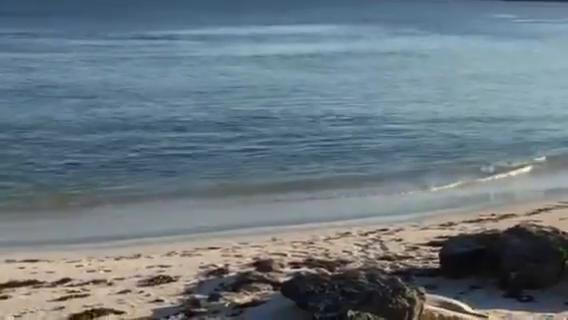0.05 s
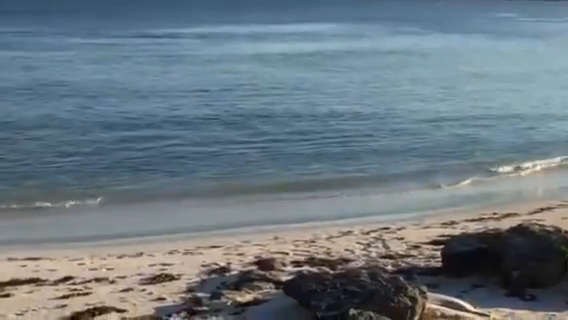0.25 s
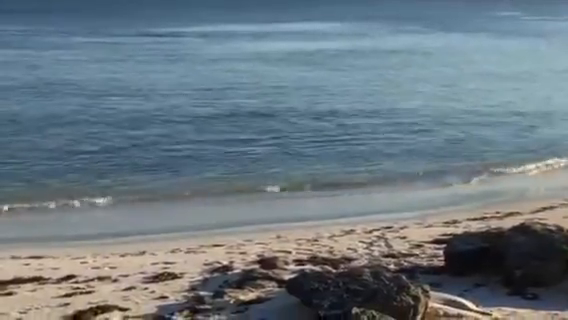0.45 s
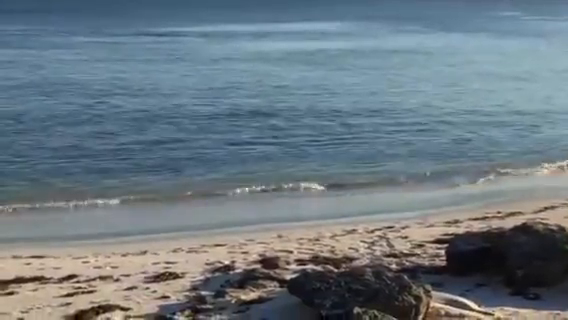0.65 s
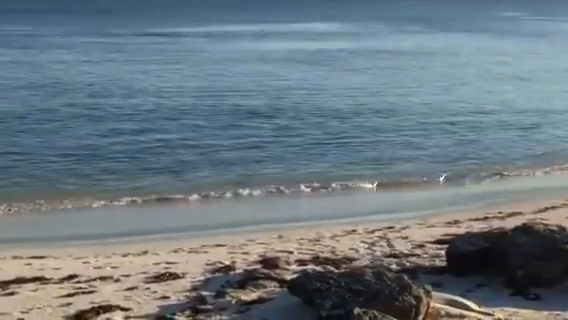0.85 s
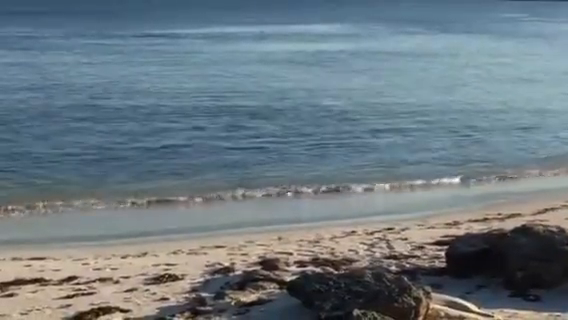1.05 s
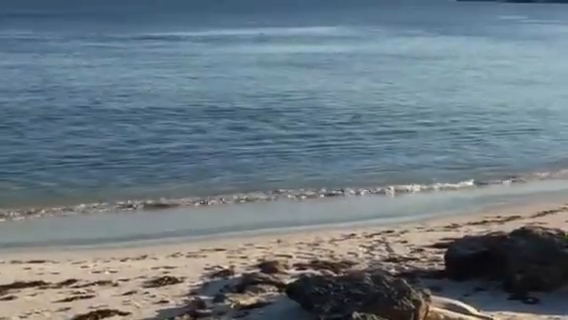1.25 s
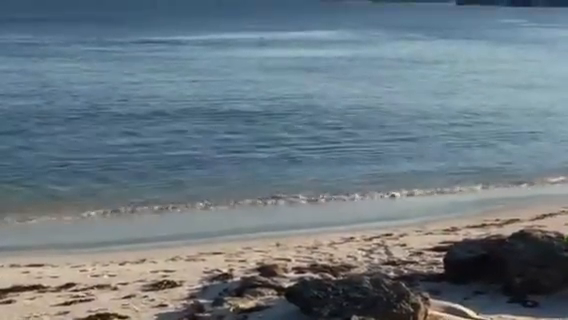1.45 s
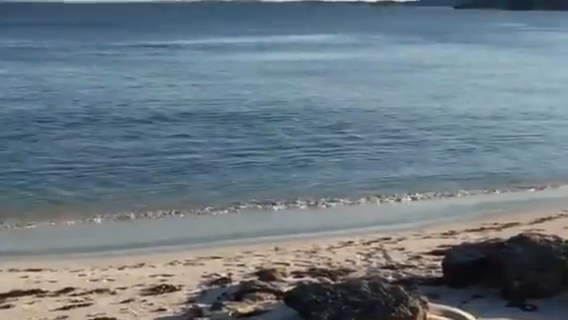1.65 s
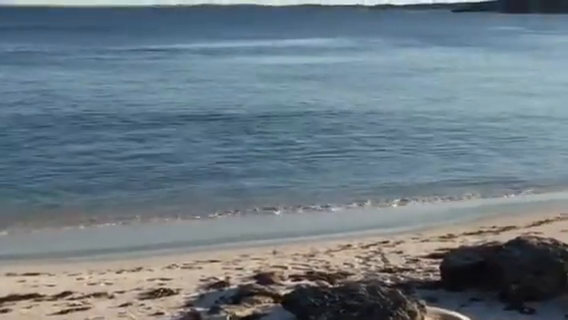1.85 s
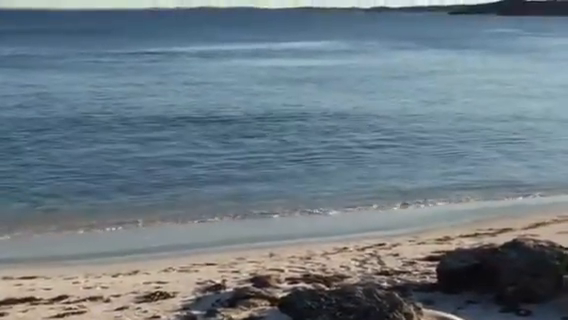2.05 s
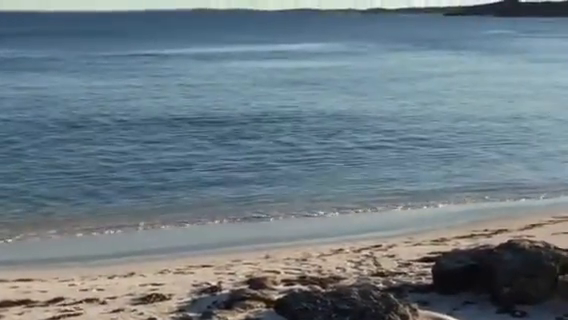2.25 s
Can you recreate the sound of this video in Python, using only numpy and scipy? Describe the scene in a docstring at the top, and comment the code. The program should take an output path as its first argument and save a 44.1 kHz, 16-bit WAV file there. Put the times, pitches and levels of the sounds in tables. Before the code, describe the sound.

A small wave breaks on a sandy beach a few metres away. Quiet lapping swells into churning bubbles, fizzing foam, plops and soft slaps, then the wash dies away in the open air.

```python
"""A calm sea laps over a faint rumble, and single bubbles begin to plop. Then a small wave breaks
along a sandy beach a few metres away: foam fizzes, a cloud of bubbles churns, big air pockets gulp
under the folding crest, and water slaps and thuds softly before the wash dies out on the sand.
Each bubble is a damped resonator, with the trapped air as its spring and the water around it as its
mass: the larger the bubble, the lower it rings."""
import sys
import numpy as np
from scipy.fft import rfft, irfft, next_fast_len
from scipy.io import wavfile
from scipy.ndimage import map_coordinates

SR = 44100
rng = np.random.default_rng(int(sys.argv[2]) if len(sys.argv) > 2 else 0)


def master_out(mix):
    """Clip the mix to full scale and print it as 16-bit PCM to the path in sys.argv[1]."""
    frames = np.transpose(np.atleast_2d(mix))
    ceiling = np.clip(frames, -1, 1)
    pcm = np.round(ceiling * 32767).astype(np.int16)
    wavfile.write(sys.argv[1], SR, pcm)


N = 101429
FADE_DB_PER_S = 66


def amp(db):
    """Decibels to amplitude ratio."""
    return 10 ** (np.asarray(db) / 20)


def unit(x):
    """Normalisation to rms 1."""
    return x / np.sqrt(np.mean(x ** 2) + 1e-20)


def level(rows):
    """Amplitude envelope through (s, dB) points, with exponential decay beyond both ends."""
    s, db = np.transpose(rows)
    t = np.arange(N) / SR
    outside_s = np.abs(t - np.clip(t, s[0], s[-1]))
    return amp(np.interp(t, s, db) - FADE_DB_PER_S * outside_s)


def wobble(rate):
    """Random modulation: a smooth curve with rate knots a second."""
    return map_coordinates(rng.standard_normal(400), [np.arange(N) * rate / SR], mode="wrap")


def filtered(x, response):
    """Linear filtering: the spectrum of x times a frequency response."""
    m = next_fast_len(len(x) + 8192)
    return irfft(rfft(x, m) * response(np.fft.rfftfreq(m, 1 / SR)), m)[:len(x)]


def coloured(x, points):
    """Spectral shaping of x through (Hz, dB) points, at rms 1."""
    f, db = np.transpose(points)
    return unit(filtered(x, lambda hz: amp(np.interp(np.log(hz + 1), np.log(f + 1), db))))


def add(track, s, sound):
    """Superposition of a sound on the track at s seconds."""
    part = track[max(round(s * SR), 0):][:len(sound)]
    part += sound[:len(part)]


def cloud(lo_hz, hi_hz, cycles, spread_db, rise, count):
    """Bubble resonance: many damped sines start at random times, each rising in pitch."""
    when, pitch, size, life = rng.random((count, 4)).T[:, :, None]
    hz = lo_hz * (hi_hz / lo_hz) ** pitch
    t60 = cycles * (.5 + life) / hz
    t = np.arange(int(min(cycles / lo_hz, .08) * SR)) / SR
    gain = amp(spread_db * np.minimum(-np.log(1 - size), np.pi)) * hz  # even power per Hz
    envelope = gain * amp(-60 * t / t60) * (1 - np.exp(-2 * hz * t))
    rings = envelope * np.sin(2 * np.pi * hz * t * (1 + rise * np.minimum(t / t60, 1) / 2))
    at = (when * N).astype(int) + np.arange(len(t))
    return unit(np.bincount(at.ravel(), rings.ravel())[:N])


def water(bubbles, spectrum, blur_db, surge_db, surge_rate):
    """Incoherent summation: countless small bubbles blur into noise under distinct ones; both surge."""
    blur = amp(blur_db) * coloured(rng.standard_normal(N), spectrum)
    mix = coloured(bubbles, spectrum) + blur
    return unit(mix * amp(surge_db * wobble(surge_rate)))


# Spectrum of the calm sea. Each row: frequency in Hz, relative level in dB.
SEA_SPECTRUM = [(60, -24), (110, -2), (200, -10), (300, -5.5), (470, -14.5), (660, -8), (850, -14),
                (1200, -8.5), (1450, -14.5), (1900, -11), (3000, -15.5), (5000, -22), (7500, -25.5),
                (10400, -27.5), (15000, -30.5)]
SEA_DB = -63

def sea():
    """Superposition: the brief bubble tones of ripples along the shore sum to a steady lapping."""
    ripples = cloud(409.5, 8170, cycles=16, spread_db=2, rise=0.075, count=2600)
    return amp(SEA_DB) * water(ripples, SEA_SPECTRUM, blur_db=4.5, surge_db=0.6, surge_rate=12)


# Envelope of the rumble. Each row: time in seconds, relative level in dB.
RUMBLE_ENVELOPE = [(0, -75), (.42, -72.5), (.60, -64), (.84, -67.5), (.95, -63), (1.35, -71.5),
                   (1.67, -63.5), (1.95, -72.5), (2.3, -78)]
# Its spectrum. Each row: frequency in Hz, relative level in dB.
RUMBLE_SPECTRUM = [(10, -60), (24, -26), (36, -17.5), (50, 3.5), (75, -1), (100, -5), (150, -8), (300, -31),
                   (900, -85)]

def rumble():
    """Amplitude-modulated noise: the moving water swells into soft, low thuds."""
    return amp(1.5) * level(RUMBLE_ENVELOPE) * coloured(rng.standard_normal(N), RUMBLE_SPECTRUM)


def spray(hz, octaves, size):
    """Band-limited noise: fine drops merge into a patter around one pitch, at rms 1."""
    noise = rng.standard_normal(size)
    return unit(filtered(noise, lambda f: np.exp(-.5 * (np.log2((f + 1) / hz) / octaves) ** 2)))


# Bubbles that stand out. Each row: start in seconds, pitch in Hz, level in dB,
# 60 dB decay time in seconds, gain of the splash relative to the ring.
SINGLE_BUBBLES = [(.223, 628, -51, 0.09, 0.11), (0.228, 1140, -47, 0.05, 0.54),
                  (0.321, 311, -54.5, 0.1, 0.26), (.352, 1196, -46, 0.054, 0.31),
                  (0.433, 155, -54.5, 0.13, 1), (.524, 710, -40, 0.035, 0.45), (.530, 1070, -48, .04, .5),
                  (0.607, 321, -48, 0.14, 0.63), (.636, 108.7, -45.5, 0.082, 0.45),
                  (0.659, 355, -45.5, 0.11, 0.96), (0.713, 1105, -40, 0.043, 0.65),
                  (0.757, 1164, -38, 0.06, 0.5), (0.796, 319, -51, 0.067, .5),
                  (.812, 55.3, -50, 0.24, 0.27), (.912, 737, -37.5, .06, 0.48),
                  (1.091, 710, -45.5, 0.067, 0.83), (1.171, 1180, -45, 0.083, 0.25),
                  (1.186, 302, -51, 0.29, 0.13), (1.224, 141, -56, 0.13, 0.72), (1.3, 1200, -40, 0.055, .6),
                  (1.313, 167, -49, 0.095, 0.53), (1.385, 321, -42.5, .07, 0.36),
                  (1.476, 306, -48.5, 0.11, 0.47), (1.479, 1176, -45, 0.078, .2),
                  (1.546, 685, -34.5, 0.028, 0.32), (1.553, 322, -48, .08, 0.73),
                  (1.571, 1360, -39.5, 0.04, 0.18), (1.692, 665, -50, 0.1, 0.18),
                  (2.010, 1024, -48, 0.054, 0.75), (2.019, 685, -61, 0.08, 1.0),
                  (2.111, 465, -53, 0.057, 0.57), (2.225, 128, -57.5, 0.1, 1),
                  (2.288, 653, -53, 0.11, 0.44)]
PLOP_ATTACK_S, PLOP_RISE_PER_S = 0.0024, 0.83

def plops():
    """Damped oscillation: each large bubble rings with a rising pitch inside its own little splash."""
    out, t = np.zeros(N), np.arange(SR // 5) / SR
    for start, hz, db, t60, splash in SINGLE_BUBBLES:
        ring = np.sin(2 * np.pi * hz * t * (1 + PLOP_RISE_PER_S * t / 2))
        envelope = amp(db - 60 * t / t60) * (1 - np.exp(-t / PLOP_ATTACK_S))
        add(out, start, envelope * (ring + splash * spray(hz, octaves=0.3, size=len(t))))
    return out


# Envelope of the foam. Each row: time in seconds, relative level in dB.
FOAM_ENVELOPE = [(.30, -77), (.365, -66.5), (.53, -69), (.69, -56.5), (.85, -54.5), (1.03, -56.5),
                 (1.27, -58), (1.39, -55), (1.59, -61), (1.72, -66.5), (1.92, -73.5), (2.15, -73)]
# Its spectrum. Each row: frequency in Hz, relative level in dB.
FOAM_SPECTRUM = [(600, -72), (2000, -20), (4000, -1), (6000, 1), (7500, -5.5), (9500, -7), (10400, -14.5),
                 (12000, -12), (15000, -20.5)]

def foam():
    """Resonant frequency varies inversely with radius, so tiny foam bubbles make a high fizz."""
    bubbles = cloud(3250, 15450, cycles=32, spread_db=3.5, rise=.04, count=7000)
    fizz = water(bubbles, FOAM_SPECTRUM, blur_db=1.0, surge_db=0.7, surge_rate=24.85)
    return amp(1.2) * level(FOAM_ENVELOPE) * fizz


# Envelope of the churning. Each row: time in seconds, relative level in dB.
CHURN_ENVELOPE = [(.305, -66.5), (.345, -57.5), (.42, -52.5), (.55, -53), (.58, -51), (.70, -47),
                  (.82, -48), (1.0, -46.5), (1.27, -48.5), (1.46, -46), (1.63, -51), (1.77, -54.5),
                  (1.87, -60.5), (1.93, -67), (2.06, -65.5)]
# Its spectrum. Each row: frequency in Hz, relative level in dB.
CHURN_SPECTRUM = [(100, -72), (250, -46), (550, -3.5), (800, -7.5), (1150, 0), (1600, -1.5), (2600, -2.5),
                  (4000, -6.5), (5500, -17.5), (8000, -28.5), (12000, -60)]

def churn():
    """Air entrainment: the spilling crest drags in thousands of ringing bubbles."""
    bubbles = cloud(544.6, 6316, cycles=73, spread_db=3.5, rise=0.038, count=4600)
    wash = water(bubbles, CHURN_SPECTRUM, blur_db=2, surge_db=.5, surge_rate=40)
    return amp(0.33) * level(CHURN_ENVELOPE) * wash


# Envelope of the air pockets. Each row: time in seconds, relative level in dB.
POCKET_ENVELOPE = [(.32, -85), (.49, -62.5), (.555, -63), (.576, -53), (.67, -50), (.73, -53), (1.0, -53),
                   (1.27, -58.5), (1.37, -51), (1.54, -58), (1.62, -60.5), (1.85, -70)]
# Their spectrum. Each row: frequency in Hz, relative level in dB.
POCKET_SPECTRUM = [(40, -54), (80, -11), (130, -10.5), (200, -6.5), (310, -1), (450, -3), (700, -0.5),
                   (950, 1.5), (1600, -15), (4000, -70)]

def air_pockets():
    """Mass-spring resonance: big pockets of air under the folding crest pulsate in low gulps."""
    pockets = cloud(112, 1067, cycles=22.5, spread_db=2.0, rise=0.063, count=800)
    gulps = water(pockets, POCKET_SPECTRUM, blur_db=0, surge_db=2.1, surge_rate=25)
    return level(POCKET_ENVELOPE) * gulps


# Slaps of water and drops. Each row: start in seconds, centre frequency in Hz, level in dB,
# 60 dB decay time in seconds.
WATER_IMPACTS = [(.329, 3170, -47.5, 0.062), (.410, 2270, -50, 0.14), (0.568, 2770, -51, 0.093),
                 (.566, 380, -49.5, 0.071), (.579, 14000, -53, .04), (0.675, 3440, -44, 0.064),
                 (0.757, 1700, -31, 0.018), (0.776, 8500, -50, .04), (2.010, 2260, -58, 0.11)]
SLAP_ATTACK_S, SLAP_OCTAVES = 0.003, 0.56

def slaps():
    """Impact noise: pieces of the crest hit the water and throw a short spray."""
    out, t = np.zeros(N), np.arange(SR // 5) / SR
    for start, hz, db, t60 in WATER_IMPACTS:
        envelope = amp(db - 60 * t / t60) * (1 - np.exp(-t / SLAP_ATTACK_S))
        add(out, start, envelope * spray(hz, SLAP_OCTAVES, size=len(t)))
    return out


def scene():
    """Free field: on the open beach the sources add without echo, in mono."""
    return (sea() + rumble() + plops() + foam() + churn() + air_pockets() + slaps())[None]


TOP_HZ = 15300

def record(dry):
    """Band limiting: an ideal low-pass filter removes everything above TOP_HZ."""
    return np.array([filtered(channel, lambda hz: hz < TOP_HZ) for channel in dry])


dry = scene()
out = record(dry)
master_out(out)
```